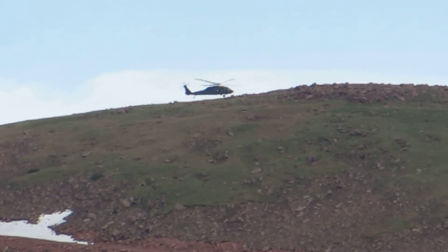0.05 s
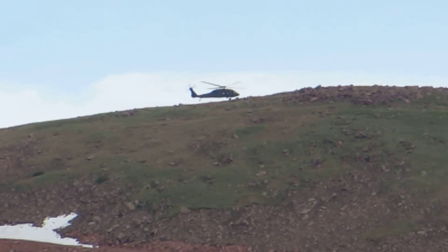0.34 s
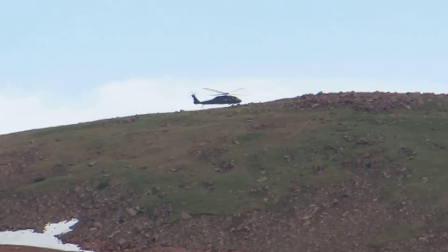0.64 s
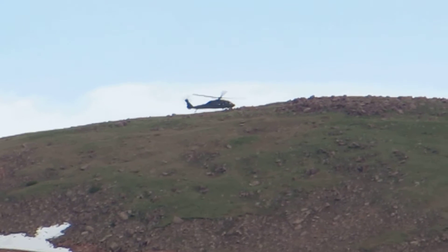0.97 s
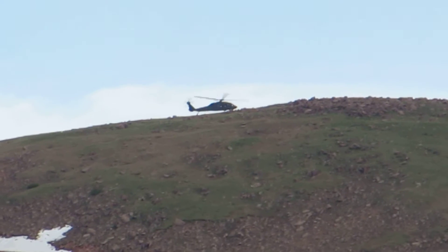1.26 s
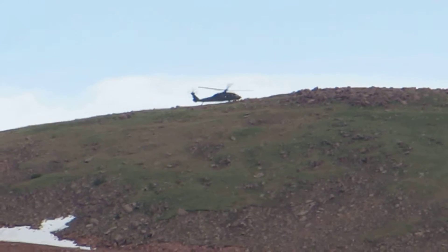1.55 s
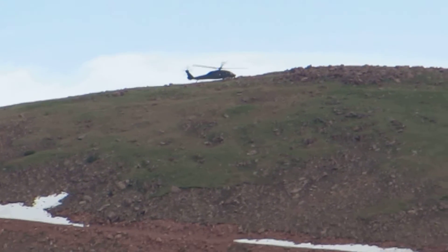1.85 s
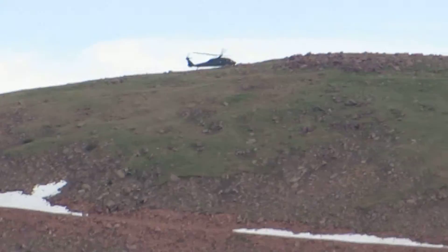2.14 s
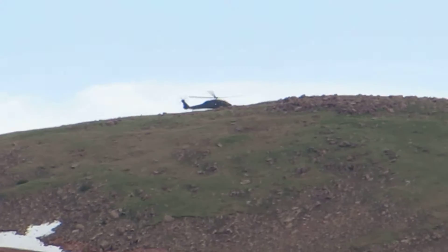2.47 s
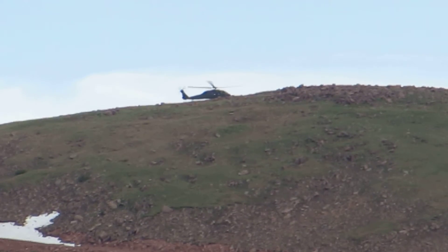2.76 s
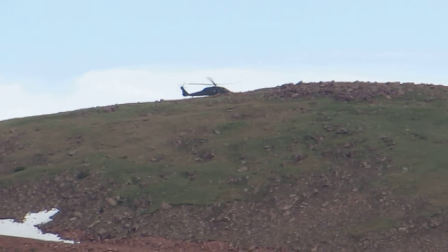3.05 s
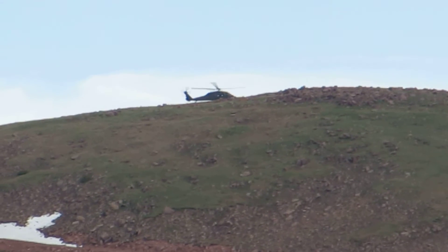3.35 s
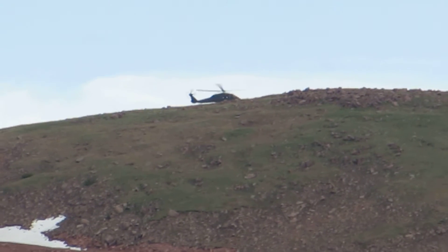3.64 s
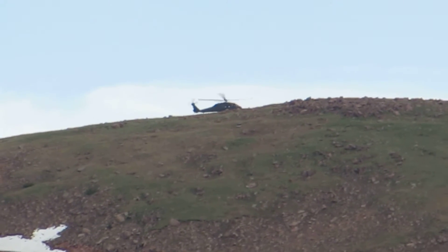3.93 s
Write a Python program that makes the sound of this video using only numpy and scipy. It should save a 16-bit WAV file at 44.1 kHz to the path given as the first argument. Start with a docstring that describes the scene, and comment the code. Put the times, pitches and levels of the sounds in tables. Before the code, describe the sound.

A distant helicopter hovers over an open mountain ridge, its fast rotor thud and engine drone swelling and fading. Wind softly bumps the microphone, two tiny ticks sound early, and the blade slap hardens midway, then softens.

```python
"""A distant helicopter hovers over an open mountain ridge. From the start, rotor wash and engine roar
swell and fade in the moving air and the tail rotor drones, over faint recorder hiss and wind rumble.
The main rotor thuds and slaps about 17 times a second. A small tick sounds close by at 0.4 s, then
eddies begin to bump the microphone; a fainter, higher tick follows at 1.2 s. The slap is hardest
from 2 to 2.5 s, drops away briefly and comes back softer."""
import sys
import numpy as np
from scipy.fft import rfft, irfft, next_fast_len
from scipy.io import wavfile
from scipy.ndimage import uniform_filter1d, map_coordinates

SR = 44100
rng = np.random.default_rng(int(sys.argv[2]) if len(sys.argv) > 2 else 0)


def log_audio(samples):
    """Write samples as a 16-bit WAV file to the path given in sys.argv[1]."""
    # one column per channel
    frames = np.atleast_2d(samples).T
    # limit to full scale, then quantise
    limited = np.clip(frames, -1, 1)
    pcm = np.round(limited * 32767).astype(np.int16)
    wavfile.write(sys.argv[1], SR, pcm)


N = 176400
BLADE_HZ, FIRST_BLADE_S = 17.335, .0094  # the main rotor's beat, shared by wash, roar, thud and slap


def amp(db):
    """Decibels to gain."""
    return 10 ** (np.asarray(db) / 20)


def unit(x):
    """Scaled to rms 1."""
    return x / np.sqrt(np.mean(x ** 2) + 1e-20)


def clock():
    """The time of each sample in seconds."""
    return np.arange(N) / SR


def curve(rows):
    """A fader ride: (time_s, value) points joined by straight lines."""
    return np.interp(clock(), *np.transpose(rows))


def wobble(rate):
    """A smooth random curve, rate knots a second."""
    return map_coordinates(rng.standard_normal(512), [clock() * rate + 2], mode="mirror")


def coloured(x, eq):
    """x through a causal EQ of (freq_hz, gain_db) points, at rms 1."""
    m = 2 * next_fast_len(N)
    hz, db = np.transpose(eq)
    gain_db = np.interp(np.log(np.fft.rfftfreq(m, 1 / SR) + 1), np.log(hz + 1), db)
    cepstrum = irfft(np.log(amp(gain_db)))
    cepstrum[1:m // 2] *= 2  # minimum phase: no ringing ahead of a hit
    cepstrum[m // 2 + 1:] = 0
    return unit(irfft(rfft(x, m) * np.exp(rfft(cepstrum)))[:N])


def noise(eq):
    """Coloured noise of rms 1."""
    return coloured(rng.standard_normal(N), eq)


def harmonics(rows, cycles, fade_db, fade_hz):
    """One pulse a cycle, each of its harmonics fading on its own in the moving air."""
    return np.sqrt(2) * sum(amp(db + fade_db * wobble(fade_hz)) * np.cos(2 * np.pi * round(k) * cycles)
                            for k, db in rows)


# Fader rides for the mid wash, low wash and engine roar, ahead of their trims: time_s, level_db
MID_WASH_RIDE = [(0, -57), (.3, -54), (.8, -55.5), (1.3, -54.5), (1.8, -55), (2.2, -59.5), (2.5, -55),
                 (2.75, -59), (3.2, -55.5), (3.55, -54), (4, -57.5)]
LOW_WASH_RIDE = [(0, -59), (.7, -56.5), (1.2, -60), (1.8, -54), (2.3, -57), (2.49, -53), (2.66, -54.5),
                 (3.2, -53.5), (3.75, -54.5), (4, -52.5)]
ROAR_RIDE = [(0, -57), (.76, -57.5), (1.3, -58), (2, -60), (3, -60), (4, -59.5)]
# EQ for the hollow mid wash, its low body and the brighter roar: freq_hz, gain_db
MID_WASH_EQ = [(250, -22), (420, -3), (480, 1), (530, 3.5), (640, -3), (710, -9.5), (780, -20), (1100, -50),
               (3000, -89)]
LOW_WASH_EQ = [(60, -26.5), (130, -6.5), (170, -4.5), (205, -5), (260, -3), (320, 2.5), (385, 1),
               (440, -6.5), (520, -20.5), (800, -45.5), (2000, -88)]
ROAR_EQ = [(400, -22.5), (780, -10), (850, -7), (920, -3.5), (1060, -2.5), (1110, -7.5), (1170, 1),
           (1290, -1.5), (1450, -5), (1750, -3.5), (2050, -12), (2220, -11.5), (2700, -20.5), (3400, -30.5),
           (6000, -68)]


def wash_and_roar(wash_trim_db=.5, roar_trim_db=-2.5, wash_throb_db=.93, roar_throb_db=.6, lag_s=.015):
    """Two bands of blade turbulence and the engine exhaust, all throbbing at the blade rate."""
    throb = np.cos(2 * np.pi * BLADE_HZ * (clock() - FIRST_BLADE_S - lag_s))
    mid_wash = amp(curve(MID_WASH_RIDE)) * noise(MID_WASH_EQ)
    low_wash = amp(curve(LOW_WASH_RIDE)) * noise(LOW_WASH_EQ)
    wash_db = wash_trim_db + wash_throb_db * throb + .5 * wobble(8.7)
    roar_db = curve(ROAR_RIDE) + roar_trim_db + roar_throb_db * throb + .42 * wobble(10)
    return amp(wash_db) * (mid_wash + low_wash) + amp(roar_db) * noise(ROAR_EQ)


# The buzz on top of the tail rotor's hum: harmonic_number, gain_db
TAIL_OVERTONES = [(2, 1), (3, -5), (4, -5.5), (5, -1.2), (6, -10.5), (7, -9), (8, -11.5)]
# Fader rides for the hum and the buzz: time_s, fundamental_db, overtones_db
TAIL_RIDE = [(0, -63.5, -64.5), (.9, -59, -65.5), (1.2, -55.5, -65), (1.55, -62, -59.5), (2.1, -63, -63.5),
             (2.35, -55.5, -65.5), (3.3, -53.5, -65.5), (3.8, -53, -64.5), (4, -56, -68)]


def tail_rotor(pitch_hz=79.4):
    """The tail blades' fast pulses merge into a drone; its hum and buzz swell at different times."""
    cycles = pitch_hz * (clock() + .00022 * wobble(2.93))
    time_s, fundamental_db, overtones_db = np.transpose(TAIL_RIDE)
    hum_gain = amp(np.interp(clock(), time_s, fundamental_db))
    buzz_gain = amp(np.interp(clock(), time_s, overtones_db))
    hum = np.sqrt(2) * np.cos(2 * np.pi * cycles)
    buzz = harmonics(TAIL_OVERTONES, cycles, fade_db=2.5, fade_hz=3.08)
    return hum_gain * hum + buzz_gain * buzz


# EQ for the airy noise floor: freq_hz, gain_db
HISS_EQ = [(100, -3.5), (3000, -5), (4200, -3.5), (6000, -1), (7500, 1), (9100, 0.5), (9750, 3),
           (10400, 0.2), (13000, -1.2), (15800, -5.5)]
# Thin, steady whine in the top end: pitch_hz, level_db
WHINE_TONES = [(9922, -90), (13335, -97.5)]


def recorder_hiss(level_db=-69.5):
    """The recorder's own noise and thin whine."""
    whine = np.sqrt(2) * sum(amp(db) * np.sin(2 * np.pi * hz * clock()) for hz, db in WHINE_TONES)
    return amp(level_db) * noise(HISS_EQ) + whine


# EQ for the bass-heavy wind rumble: freq_hz, gain_db
WIND_EQ = [(8, -23), (20, -6.5), (35, -1), (58, -1.5), (90, -1.5), (130, -8.5), (200, -16.5), (280, -23.5),
           (450, -40), (2000, -89.5)]
# Soft puffs on top of the rumble: centre_s, half_width_s, level_db
WIND_PUFFS = [(0.093, 0.049, -48), (0.513, .025, -43), (0.583, .045, -45), (1.864, 0.045, -48.5),
              (2.38, 0.028, -51)]


def wind(bed_db=-53.5):
    """Wind on the microphone: a bed of low rumble with short puffs."""
    power = amp(bed_db + wobble(6.2)) ** 2
    for centre_s, half_width_s, level_db in WIND_PUFFS:
        power += amp(level_db) ** 2 * np.exp(-((clock() - centre_s) / half_width_s) ** 2)
    return np.sqrt(power) * noise(WIND_EQ)


# The main rotor's low end, stacked on the blade rate, ahead of the swell: harmonic_number, level_db
THUD_HARMONICS = [(1, -60.5), (2, -55.5), (3, -52.5), (4, -63), (5, -64), (6, -68.5), (7, -62.5),
                  (8, -77.5), (9, -72.5), (10, -71)]
# Slow swell on the thud: time_s, gain_db
THUD_RIDE = [(0, -0.5), (.4, -3), (.9, 0), (1.35, 0.5), (1.8, -2.5), (2.15, -3.5), (2.5, 2.5), (2.9, -0.5),
             (3.35, -3), (4, -2)]


def rotor_thud():
    """Each main blade sends out one low pressure pulse."""
    cycles = BLADE_HZ * (clock() - FIRST_BLADE_S + .00022 * wobble(3))
    swell = amp(curve(THUD_RIDE) + .7 * wobble(6.42))
    return swell * harmonics(THUD_HARMONICS, cycles, fade_db=.9, fade_hz=3.15)


# Fader ride for the blade slap: time_s, level_db
SLAP_RIDE = [(0, -71), (1.0, -61), (1.85, -60), (2.03, -54.5), (2.22, -55), (2.36, -58.5), (2.49, -54.5),
             (2.7, -79), (3.3, -62), (4, -63.5)]
# EQ that turns each click into a dull, boxy clap: freq_hz, gain_db
SLAP_EQ = [(100, -20), (220, -14.5), (330, 0.5), (400, -1.5), (560, 5), (660, -4.5), (780, -21.5),
           (1300, -28), (2500, -29), (5000, -69.5)]


def blade_slap(lag_s=.00543, jitter_s=.00012, scatter_db=2, echo_s=.0047, echo_db=-5.5):
    """Each blade cuts the wake of the one before: a dull clap that the slope repeats twice."""
    blade_s = np.arange(FIRST_BLADE_S + lag_s, N / SR, 1 / BLADE_HZ)[:, None]
    bounce = np.arange(3)  # the direct clap, then two echoes
    slip_s = jitter_s * (1 + bounce) * rng.standard_normal((len(blade_s), len(bounce)))
    arrival_s = blade_s + echo_s * bounce + slip_s
    gain = amp(echo_db * bounce + scatter_db * rng.standard_normal(arrival_s.shape))
    arrival_sample = np.abs(arrival_s * SR).astype(int)
    clicks = np.bincount(arrival_sample.ravel(), -gain.ravel(), N)[:N]
    return amp(curve(SLAP_RIDE)) * coloured(clicks, SLAP_EQ)


# Cues for the two close ticks: start_s, level_db, pitch_hz, t60_s
TICK_CUES = [(0.4278, -38.5, 2209, 0.019), (1.1947, -53, 9700, .012)]
# Resonances inside a tick: pitch_ratio, gain_db, t60_ratio
TICK_RESONANCES = [(.73, -10, 1.3), (1, 0, 1), (1.75, -12, .5), (2.9, -16, .33)]
BAND_LIMIT_HZ = 15750


def ticks(roughness_hz=156, crack_db=-12, crack_t60_s=.0062, attack_s=.00034):
    """Tiny hard contacts near the microphone: a crack and a few short, rough resonances."""
    out = np.zeros(N)
    for start_s, level_db, hz, t60_s in TICK_CUES:
        age_s = np.maximum(clock() - start_s, 0)
        body = np.zeros(N)
        for pitch_ratio, gain_db, t60_ratio in TICK_RESONANCES:
            if hz * pitch_ratio < BAND_LIMIT_HZ:
                waver_hz = roughness_hz * unit(uniform_filter1d(rng.standard_normal(N), size=24))
                ring = np.sin(2 * np.pi * np.cumsum(hz * pitch_ratio + waver_hz) / SR)
                body += amp(gain_db - 60 * age_s / (t60_s * t60_ratio)) * ring
        crack_eq = [(hz / 4, -30), (hz * .7, 0), (hz * 5.1, -3), (hz * 4, -30)]
        crack = amp(crack_db - 60 * age_s / crack_t60_s) * noise(crack_eq)
        out += amp(level_db) * (1 - np.exp(-age_s / attack_s)) * (body + crack)
    return out


# Cues for the low wind bumps: centre_s, peak_db, polarity (+1 push, -1 pull)
BUMP_CUES = [(.476, -34.5, -1), (1.405, -40, -1), (3.009, -45, 1), (3.550, -34, 1), (3.975, -35, -1)]


def wind_bumps(width_s=.0034):
    """Single eddies cross the microphone: one push or pull with a rebound on each side."""
    out = np.zeros(N)
    for centre_s, peak_db, polarity in BUMP_CUES:
        offset = (clock() - centre_s) / width_s
        out += np.sign(polarity) * amp(peak_db) * (1 - offset ** 2) * np.exp(-offset ** 2 / 2)
    return out


def scene():
    """The mono mix: a continuous bed, the main rotor's beat and the close-up spot sounds."""
    bed = wash_and_roar() + tail_rotor() + recorder_hiss() + wind()
    beat = rotor_thud() + blade_slap()
    spots = ticks() + wind_bumps()
    return (bed + beat + spots)[None]


def record(dry):
    """The recorder keeps nothing above its band limit."""
    m = 2 * next_fast_len(N)
    passband = np.fft.rfftfreq(m, 1 / SR) < BAND_LIMIT_HZ
    return irfft(rfft(dry, m) * passband, m)[:, :N]


dry = scene()
out = record(dry)
log_audio(out)
```